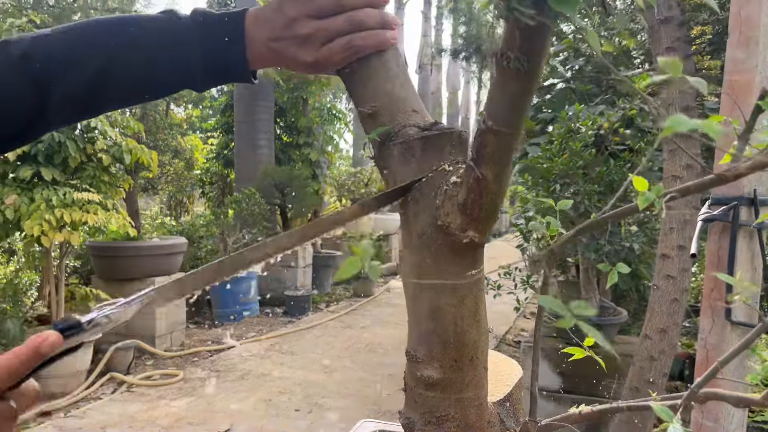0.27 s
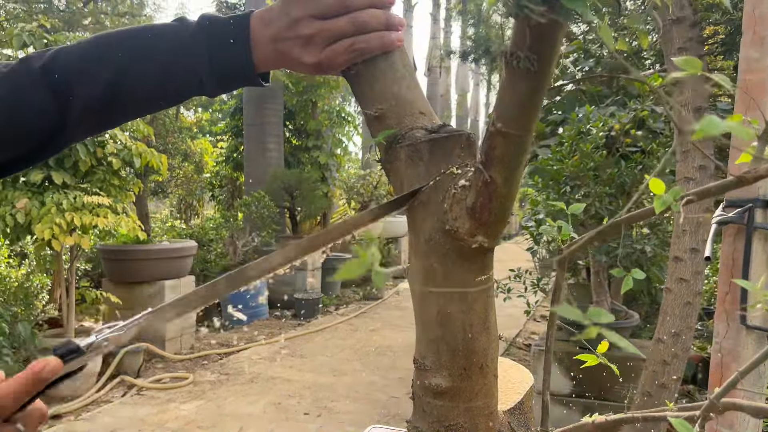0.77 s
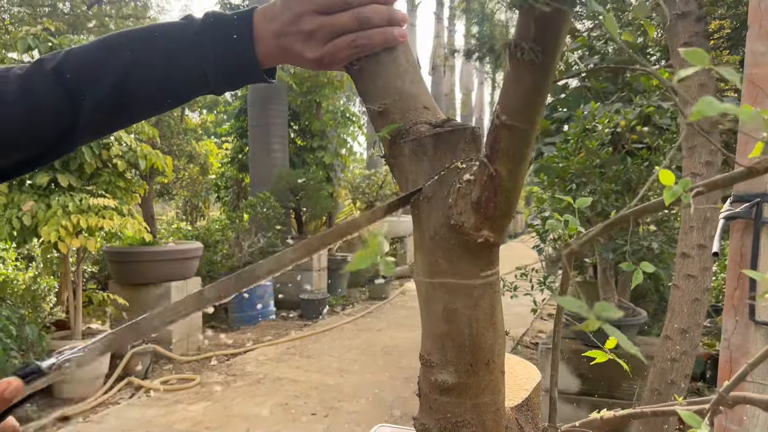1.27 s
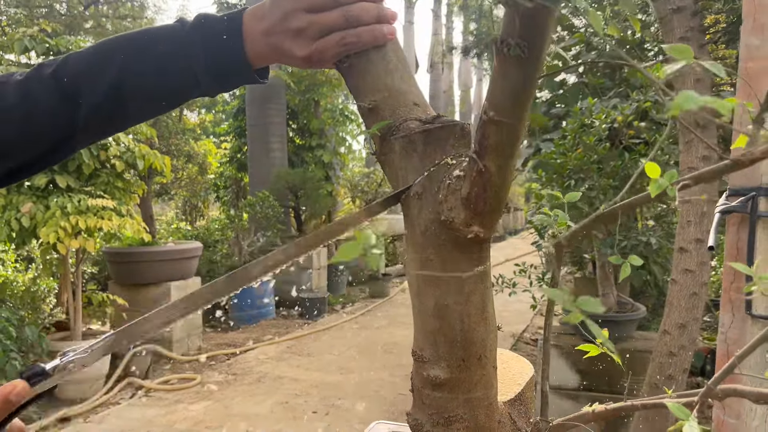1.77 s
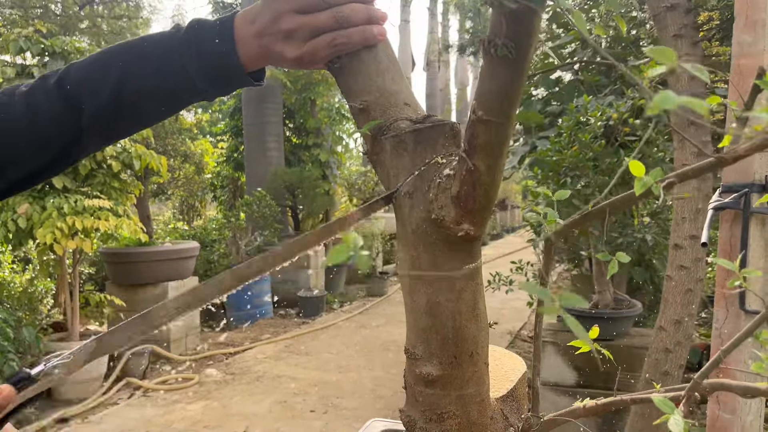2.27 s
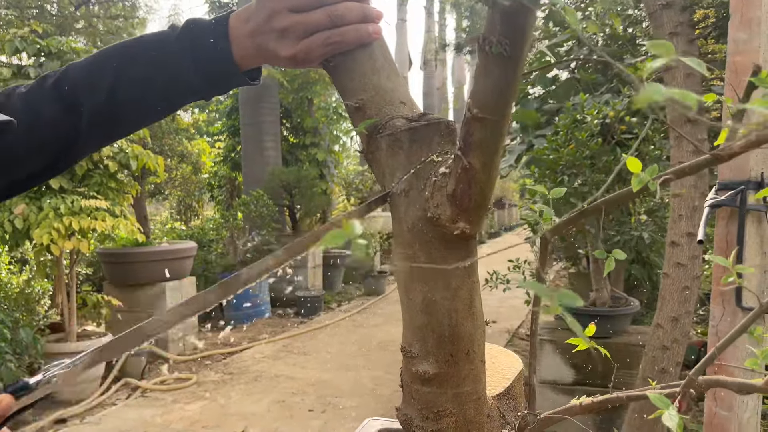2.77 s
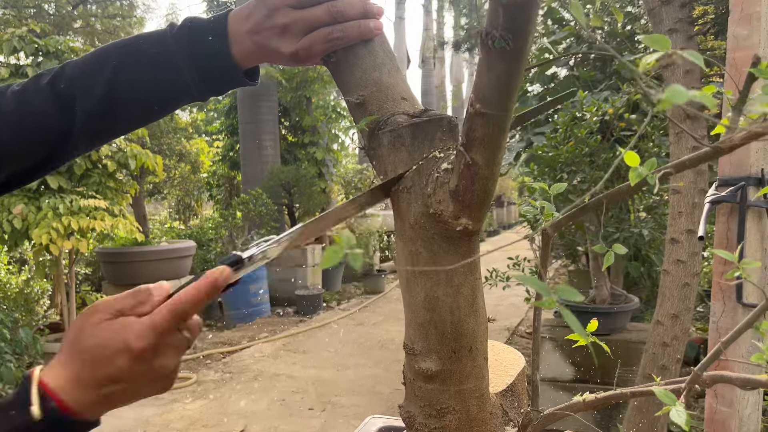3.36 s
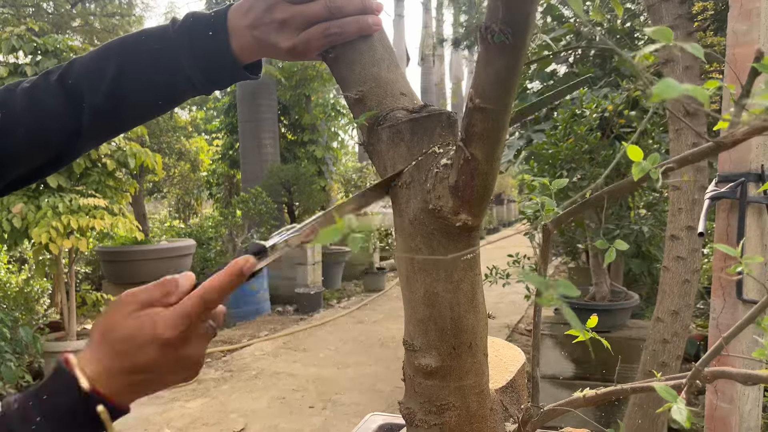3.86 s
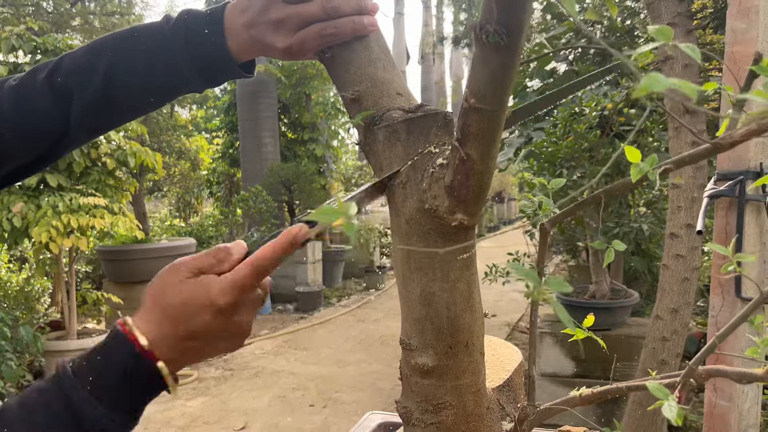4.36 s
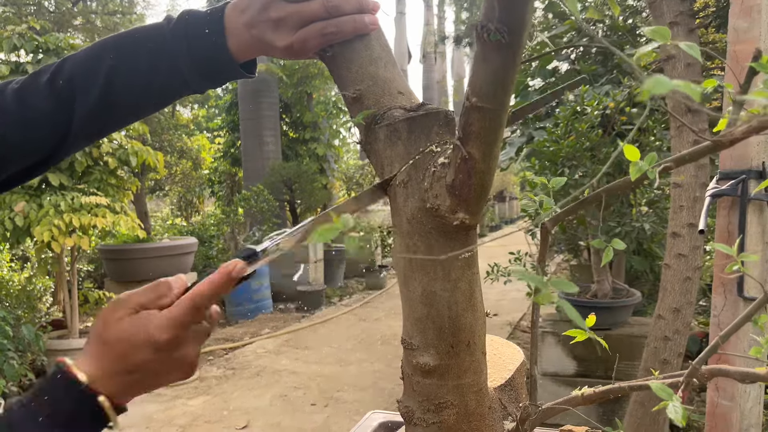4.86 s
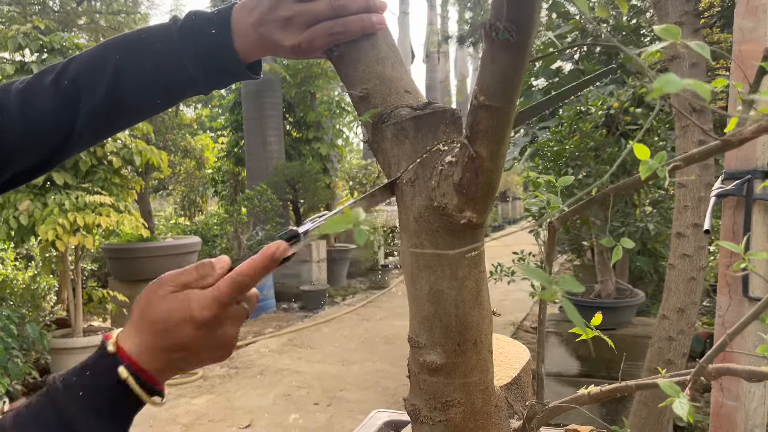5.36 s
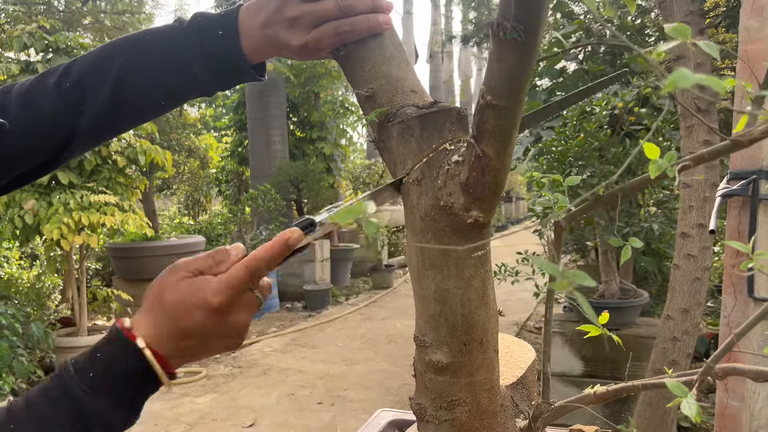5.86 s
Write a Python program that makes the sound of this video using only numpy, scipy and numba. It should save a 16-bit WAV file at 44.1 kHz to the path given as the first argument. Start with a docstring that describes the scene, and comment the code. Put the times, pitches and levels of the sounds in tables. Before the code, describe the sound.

Steady, close sawing of damp wood, with crackling teeth and a thin ringing blade over faint outdoor rumble.

```python
"""Sawing a green trunk

A pruning saw goes back and forth twice a second, close to a phone in a garden; the pull cuts deeper.
Its teeth tear fibres in a dense crackle that rings the thin blade and the damp wood.
As the cut deepens, the bite drops in pitch and the trunk grows louder and hollower.
Teeth catch with a tick now and then; a low boom wavers underneath, over faint outdoor air."""
import sys
import numpy as np
from scipy import signal
from scipy.fft import rfft, irfft
from scipy.io import wavfile
from scipy.ndimage import uniform_filter1d
from numba import njit

SR = 44100
rng = np.random.default_rng(int(sys.argv[2]) if len(sys.argv) > 2 else 0)


def unload_audio(sound):
    """Save the sound as a 16-bit wav file, at the path given as the first command line argument."""
    columns = np.transpose(np.atleast_2d(sound))
    # keep every value between -1 and 1, then stretch to whole-number steps
    steps = np.round(np.clip(columns, -1, 1) * 32767)
    wavfile.write(sys.argv[1], SR, steps.astype(np.int16))


N = 269010
TIME = np.arange(N) / SR  # seconds
DEPTH = np.arange(N) / N  # how deep the cut is: 0 at the start, 1 at the end


# Push and pull in turn, push first. Lean is how fast the pressure grows; slip is the wait before biting.
# (start [s], mid-stroke pressure [dB], lean [dB per stroke], slip [s])
SAW_STROKES = [(-0.2, -38, 3, .02), (0.032, -29.5, 2, 0.029), (0.32, -37, -15, 0.013),
               (0.557, -31.5, 9, 0.027), (0.833, -34, 5.5, 0.025), (1.053, -29.5, 12, 0.021),
               (1.322, -33.5, -3, .015), (1.535, -30, 10.5, 0.033), (1.808, -35, 1, 0.021),
               (2.015, -29, 2.5, 0.04), (2.272, -35.5, -2.5, 0.018), (2.499, -28.5, 9.5, 0.036),
               (2.766, -33.5, 5, 0.014), (2.991, -28, 4, 0.03), (3.244, -33.5, 5, .015),
               (3.463, -29, 1, 0.034), (3.728, -34.5, 11.5, 0.022), (3.949, -29, 1, 0.012),
               (4.217, -34.5, 10, .026), (4.45, -29.5, 5.5, .036), (4.715, -34.5, 19, 0.032),
               (4.952, -27, 4, 0.026), (5.203, -34.5, 14, 0.019), (5.433, -27, 11.5, 0.019),
               (5.682, -33.5, 13.5, 0.019), (5.931, -26, 9, 0.028)]

def arm(pull_slack_db, push_slack_db, ease_s, pull_grab_s, push_grab_s):
    """The arm swings the blade: gives a stroke count, the pressure in dB and how firmly the teeth sit."""
    starts, mid_db, lean_db, slip_s = np.transpose(SAW_STROKES)
    turns = np.append(starts, starts[-1] + 0.24)
    count = np.interp(TIME, turns, np.arange(len(turns)))  # 3.5 means halfway through stroke 3
    stroke, travel = count.astype(int), count % 1
    pulling = stroke % 2
    ends_db = np.where(pulling, -3, -2.5) * (2 * travel - 1) ** 2  # lighter at both ends
    pressure_db = mid_db[stroke] + lean_db[stroke] * np.clip(travel - .5, -0.36, 0.3) + ends_db
    # each pull digs hardest at one place, earlier as the cut deepens
    dig_at = 0.86 - 0.34 * DEPTH
    dig_db = 2 * pulling * bump(travel, dig_at, 0.12)
    # the hand eases off before each turn, and the teeth slide loosely until they dig in again
    nearest = np.minimum(np.round(count).astype(int), len(starts) - 1)
    since = TIME - starts[nearest]
    grab_s = np.where(nearest % 2, pull_grab_s, push_grab_s)
    loose = np.clip(1 + since / ease_s, 0, 1) * np.clip((slip_s[nearest] - since) / grab_s, 0, 1)
    slack_db = np.where(nearest % 2, pull_slack_db, push_slack_db)
    return count, uniform_filter1d(pressure_db, SR // 25), undb(slack_db * loose + dig_db)


# The tone of tearing fibres: (frequency [Hz], level [dB])
TEARING_TONE = [(150, -18.5), (800, -8), (1900, -2.5), (2500, 5), (4200, -4), (5500, -3.5), (7000, 2.5),
                (8200, 1.5), (10000, 0.5), (11500, 2.5), (13500, -0.5), (15500, -2)]

def rasp(count, speed, buzz):
    """Tearing fibres, heard directly, through the blade and through the cut."""
    fibres = snaps(speed, per_s=15000, spread_db=1.5) + undb(-15.5) * buzz
    tearing = undb(0.5) * unit(colour(fibres, TEARING_TONE))
    sound = tearing + undb(-7) * blade(fibres, count) + bite(count, speed)
    return tip_echo(sound, count, lag_s=.0022, swing_s=.0004, level_db=-5)


def snaps(speed, per_s, spread_db):
    """Fibres snap at random, more often the faster the teeth pass; the average power stays 1."""
    chance = np.clip(per_s * (speed + .1) / SR, 0, 1)
    sizes = rng.choice([-1, 1], N) * undb(spread_db * rng.standard_normal(N))
    return unit((rng.random(N) < chance) * sizes / np.sqrt(chance))


def teeth(speed, top_hz, jitter):
    """Each tooth entering the cut makes a pulse, so a faster blade buzzes higher."""
    passed = np.cumsum(top_hz * (speed + .02) * (1 + jitter * walk(300))) / SR
    hits = np.diff(np.floor(passed), prepend=0)
    pulses = hits * undb(5.4 * rng.standard_normal(N)) / np.sqrt(speed + 0.11)
    return unit(pulses - uniform_filter1d(pulses, SR // 200))


# The notes the thin blade rings at: (pitch [Hz], width [Hz], level [dB])
BLADE_NOTES = [(2450, 300, -4.5), (2855, 150, -1), (3180, 135, 5.5), (3427, 76, 11), (4070, 50, 13),
               (4277, 67, 10), (4620, 72, 11), (5160, 70, 9.5), (5870, 85, 6), (6470, 32, -4),
               (9000, 40, -20.5), (9500, 150, 9)]

def blade(fibres, count):
    """Snapping fibres ring the blade; its notes shift a little as its free length changes."""
    bend = 1 + 0.0064 * np.cos(np.pi * count) + 0.0058 * walk(14)
    return ring(fibres, BLADE_NOTES, bend, flare_db=8.5)


def bite(count, speed, fresh_hz=4430, sag_hz=1180, width_hz=2200.0):
    """The bite sings in the cut, sinks in pitch as it deepens and builds up through each pull."""
    pulling, travel = count.astype(int) % 2, count % 1
    pitch_hz = (fresh_hz - sag_hz * DEPTH ** 2) * (1 + 0.12 * walk(70))
    crackle = snaps(speed, per_s=5000, spread_db=1.0)
    singing = unit(resonate(resonate(crackle, pitch_hz, width_hz), pitch_hz, width_hz))
    pull_db, push_db = -11.5 + 22 * (np.minimum(travel, .7) - 0.38), -5.5
    halfway_db = 6.0 * np.sin(np.pi * DEPTH)
    return singing * undb(np.where(pulling, pull_db, push_db) + halfway_db)


def tip_echo(x, count, lag_s, swing_s, level_db):
    """Vibration bounces back from the blade's tip; the path changes with the stroke, sweeping the tone."""
    echo = np.interp(TIME - lag_s + swing_s * np.cos(np.pi * count), TIME, x)
    gain = undb(level_db)
    return (x + gain * echo) / np.sqrt(1 + gain ** 2)


# The notes of the trunk and handle:
# (pitch [Hz], width [Hz], level on the pull [dB], level on the push [dB], change at full depth [dB])
WOOD_NOTES = [(118, 76, -2, -9, 7.5), (207, 28, -1.5, -2, 8), (260, 31.6, 8, 4.5, -3),
              (481, 210, 0.5, -1.5, -7), (632, 107, -6, -0.5, -1), (860, 106, -3.5, -8, 11.5),
              (1232, 222, 1.5, -0.5, 1), (1539, 93, 7.5, 8, -2), (1753, 94, 2.5, 3.5, -13.5),
              (2160, 55, -14, -14, -5)]

def wood(count, speed, buzz):
    """The trunk rattles even at low speed, differently on pull and push, and hollower as the cut deepens."""
    pulling = uniform_filter1d(np.floor(count) % 2, SR // 50)
    tug_db = 3 * bump(count % 1, .22, 0.085)  # the teeth tug at the trunk early in each pull
    level_db = -40 + (1.1 + tug_db) * pulling + 2.5 * DEPTH
    notes = [(hz, width, push + (pull - push) * pulling + change * DEPTH)
             for hz, width, pull, push, change in WOOD_NOTES]
    knocks = snaps(speed, per_s=4000, spread_db=2.5) + undb(-5.5) * buzz
    bend = 1 + 0.015 * np.cos(np.pi * count) + 0.032 * walk(16)
    return ring(knocks, notes, bend, flare_db=4.0) * undb(level_db) * speed ** (0.49 + 0.18 * pulling)


# Teeth that catch: (time [s], relative level [dB])
TOOTH_CATCHES = [(0.9207, -14), (1.5633, -19.5), (1.6106, -16), (2.0502, -27), (2.1009, -23), (2.601, -14),
                 (5.001, -24), (5.451, -24)]

def catches(decay_s, level_db):
    """A tooth hooks a fibre and lets go with a short crack."""
    bursts = np.zeros(N)
    for start, db in TOOTH_CATCHES:
        bursts += undb(db + level_db) * np.exp(-np.abs(TIME - start) / decay_s) * (TIME >= start)
    return bursts * unit(colour(rng.standard_normal(N), TEARING_TONE))


# The part of the rasp that leaves the whole length of the blade: (frequency [Hz], gain [dB])
WIDE_RASP_TONE = [(150, 7.5), (1700, -11.5), (2600, -5), (6500, -1.5), (8200, -41), (10000, 1.5),
                  (12000, -57), (15000, -35)]

def wide_sound(count, speed, force, grip):
    """Sound from all along the blade, and from the trunk, is different on the left and the right."""
    rasps = force * np.array([rasp(count, speed, 0) for _ in range(2)])
    rattles = grip * np.array([wood(count, speed, 0) for _ in range(2)])
    return colour(rasps, WIDE_RASP_TONE) + undb(-8.5) * rattles


# How far the wave at the left microphone runs ahead: (frequency [Hz], phase lead [rad])
LEFT_LEAD = [(0, 0), (1030, 0.1), (1640, -0.3), (3190, 1.3), (4310, 0.2), (5080, 1.0), (5430, -0.7),
             (6550, -0.1), (7670, -3.0), (9560, -3.7), (11100, -6.4), (13000, -6.2), (14600, -9.4),
             (15300, -9.4)]
# How the two microphones differ in loudness: (frequency [Hz], left minus right [dB])
LEFT_BALANCE = [(50, 0), (300, -.5), (700, -2.6), (1700, -1.8), (4400, -1.5), (6400, -.8), (8200, 0)]

def microphones(cut, wide):
    """The cut reaches the two sides with different timing and level; the wide sound shifts only in level."""
    left = undb(over_hz(LEFT_BALANCE) / 2) * np.exp(.5j * over_hz(LEFT_LEAD))
    sides = np.array([left, 1 / left])
    return irfft(rfft(cut) * sides + rfft(wide) * np.abs(sides), N)


def garden_echo(x, decay_s, level_db):
    """The garden scatters the sound into a faint tail, different on each side."""
    t = np.arange(SR // 3) / SR
    tails = rng.standard_normal((2, len(t))) * np.exp(-t / decay_s)
    tails *= undb(level_db) / np.sqrt(np.sum(tails ** 2, axis=1, keepdims=True))
    return signal.fftconvolve(x[None], tails, axes=1)[:, :N]


# Moments when the boom swells or dips: (time [s], half length [s], gain [dB])
BOOM_SWELLS = [(0.187, .17, 15.5), (0.827, 0.11, -3), (1.392, 0.075, 11.5), (2.206, 0.068, 6.5),
               (2.646, 0.2, 6), (4.007, .12, 8.5)]

def boom(pitch_hz=59.8, wander_hz=3.63, rest_db=-47.5):
    """A deep tone that wavers in pitch and level and swells now and then."""
    swell_db = sum(gain * bump(TIME, at, half) for at, half, gain in BOOM_SWELLS)
    level_db = rest_db - 0.7 * walk(18) + swell_db
    hz = pitch_hz + wander_hz * walk(30)
    return unit(np.sin(2 * np.pi * np.cumsum(hz) / SR)) * undb(level_db)


# The tone of the outdoor air: (frequency [Hz], relative level [dB])
AIR_TONE = [(20, -27), (35, 2), (50, 6.5), (85, 8), (150, -9), (260, -6.5), (400, -10.5), (1000, -15.5),
            (3000, -89), (8000, -59), (15000, -55)]

def air():
    """Faint outdoor rumble, most of it shared by both sides."""
    shared = unit(colour(rng.standard_normal(N), AIR_TONE)) * undb(-48.0 + 1.9 * walk(5.59))
    return shared + undb(-56.5) * unit(colour(rng.standard_normal((2, N)), AIR_TONE))


def ring(x, notes, bend, flare_db):
    """Ring a set of notes, pitches times bend; each flares and fades as the contact point moves."""
    sound = np.zeros(N)
    for hz, width, db in notes:
        gain = undb(db + flare_db * np.minimum(walk(30), 1.4))
        sound += gain * resonate(x, hz * bend, float(width))
    return unit(sound)


@njit
def resonate(x, hz, width):
    """Let through one band of pitches around a centre that may move (a band-pass filter)."""
    y, band, low = np.empty(len(x)), 0., 0.
    for i in range(len(x)):
        tuning, damping = np.tan(np.pi * hz[i] / SR), width / hz[i]
        swing = (band + tuning * (x[i] - low)) / (1 + tuning * (tuning + damping))
        band, low = 2 * swing - band, low + 2 * tuning * swing
        y[i] = damping * swing
    return y


def colour(x, rows):
    """Shape a sound's tone with (frequency [Hz], gain [dB]) points."""
    return irfft(rfft(x) * undb(over_hz(rows)), N)


def over_hz(rows):
    """Join a table's points on a log scale to get a value for every frequency."""
    hz, values = np.transpose(rows)
    return np.interp(np.log(np.fft.rfftfreq(N, 1 / SR) + 1), np.log(hz + 1), values)


def walk(per_s):
    """A random wander, typically about 1 either side of zero."""
    return 1.22 * np.interp(TIME * per_s, np.arange(N), rng.standard_normal(N))


def bump(x, centre, width):
    """A smooth hill of height 1."""
    return np.exp(-((x - centre) / width) ** 2)


def undb(db):
    """Turn decibels into a multiplier."""
    return 10 ** (np.asarray(db) / 20)


def unit(x):
    """Scale to an average power of 1."""
    return x / np.sqrt(np.mean(x ** 2))


def scene():
    """The arm drives the saw through the trunk, over the boom and the air."""
    count, pressure_db, seated = arm(pull_slack_db=-8.5, push_slack_db=-7.0, ease_s=0.031,
                                     pull_grab_s=0.011, push_grab_s=0.0091)
    speed = np.abs(np.sin(np.pi * count))
    buzz = teeth(speed, top_hz=586.3, jitter=.06)
    grip = seated * undb(1.15 * walk(40) + 0.79 * walk(450))  # the teeth grip and slip unevenly
    force = undb(pressure_db) * (speed + 0.071) ** 1.4 * grip
    cut = force * rasp(count, speed, buzz) + grip * wood(count, speed, buzz)
    cut += catches(decay_s=0.0019, level_db=-8.5)
    saw = microphones(cut, wide_sound(count, speed, force, grip))
    saw += garden_echo(cut, decay_s=0.12, level_db=-23.5)
    return undb(-1.39) * saw + boom() + air()


def record(dry):
    """The phone cuts off the highest treble."""
    top_hz = 15700
    return signal.sosfilt(signal.ellip(10, .2, 80, top_hz, fs=SR, output="sos"), dry)


dry = scene()
out = record(dry)
unload_audio(out)
```